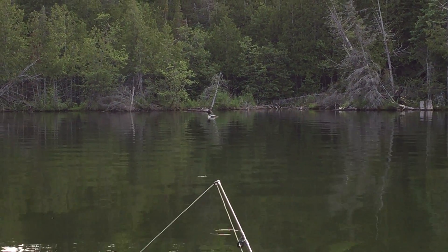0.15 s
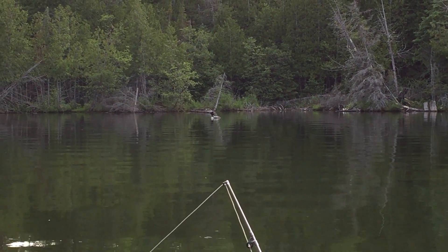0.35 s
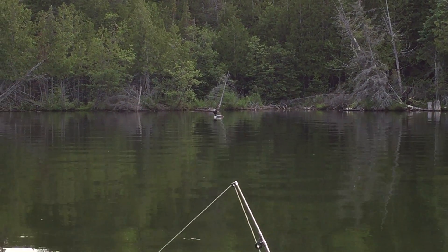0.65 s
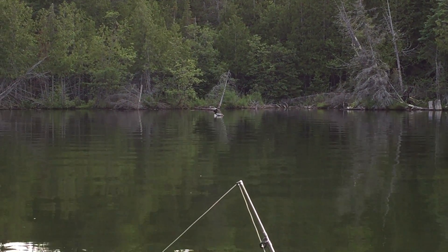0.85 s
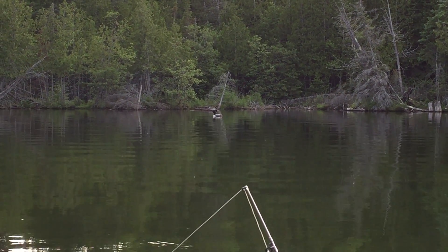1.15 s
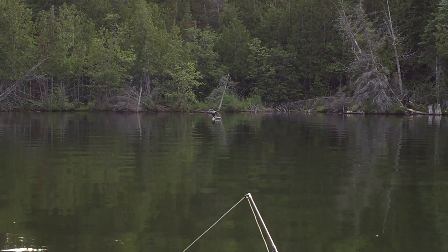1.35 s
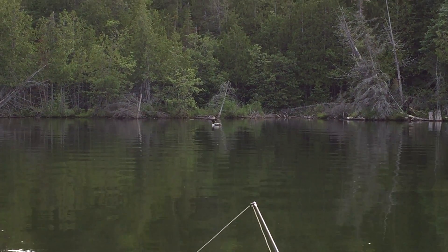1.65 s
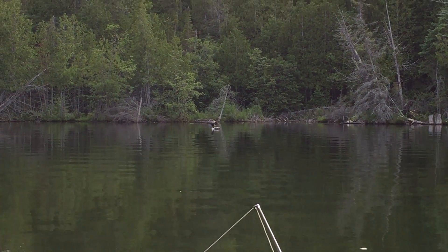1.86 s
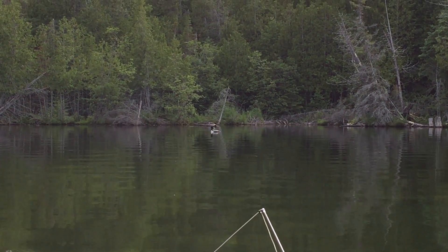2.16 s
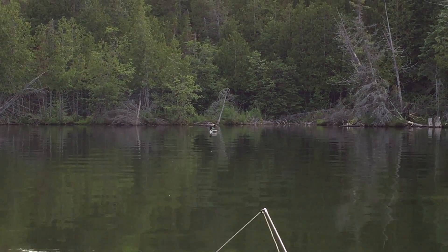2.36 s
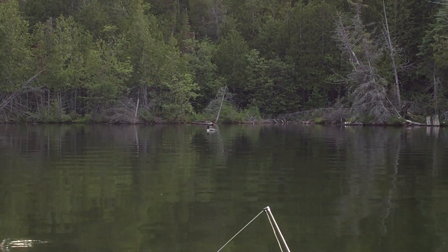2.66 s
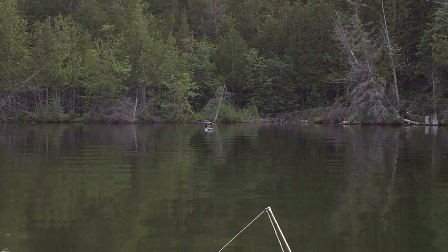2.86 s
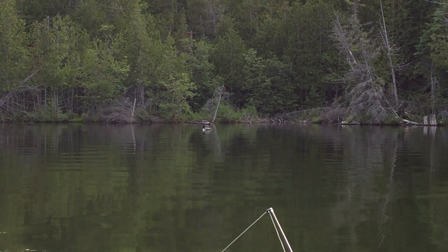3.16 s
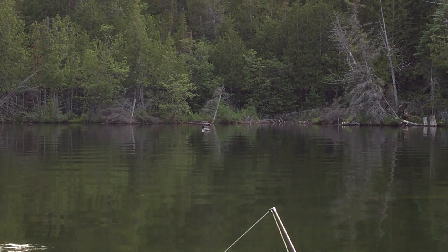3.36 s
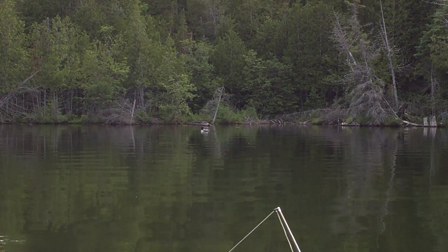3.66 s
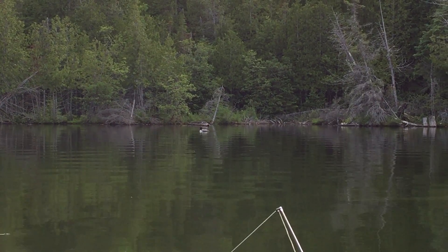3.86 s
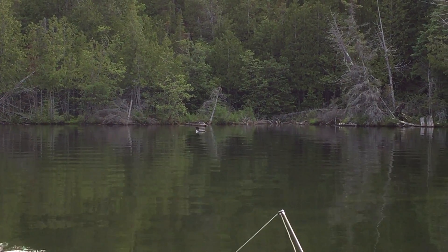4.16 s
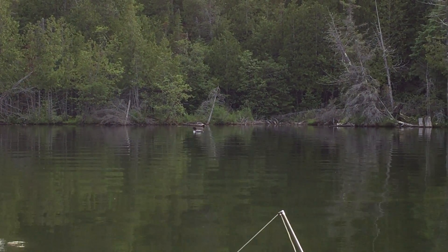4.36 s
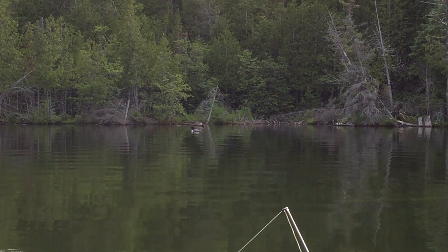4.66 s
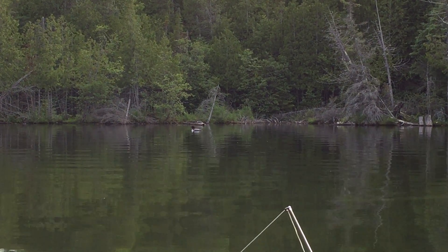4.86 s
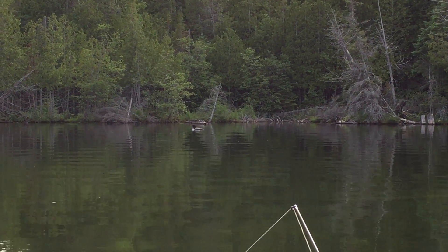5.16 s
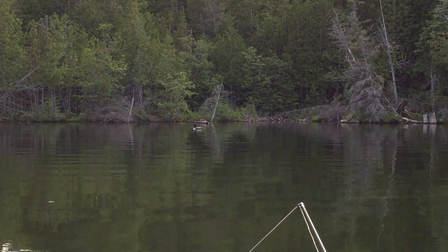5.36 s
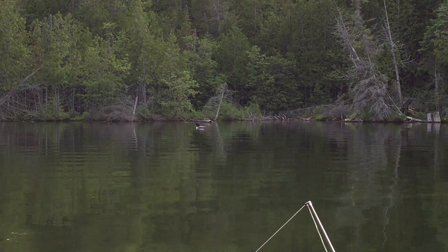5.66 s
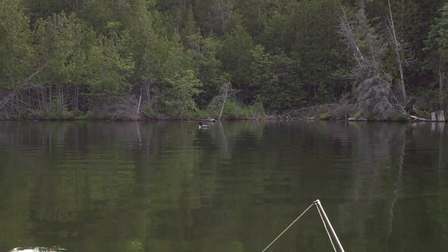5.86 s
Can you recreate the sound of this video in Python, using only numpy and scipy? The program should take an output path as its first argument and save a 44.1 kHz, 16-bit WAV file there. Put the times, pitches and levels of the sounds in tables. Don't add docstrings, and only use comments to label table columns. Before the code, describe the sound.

A loon gives two wavering tremolo cries that echo off wooded shores, then a small distant bird whistles over low rumble and hiss.

```python
import sys
import numpy as np
from scipy import signal
from scipy.fft import rfft, irfft
from scipy.io import wavfile
from scipy.ndimage import uniform_filter1d

SR = 44100
rng = np.random.default_rng(int(sys.argv[2]) if len(sys.argv) > 2 else 0)


def dump(signal):
    limited = np.clip(np.atleast_2d(signal).T, -1, 1)
    pcm = np.round(limited * 32767).astype(np.int16)
    wavfile.write(sys.argv[1], SR, pcm)


def attenuation_scalar(level_db):
    decades = np.asarray(level_db, float) / 20
    return 10 ** decades


N = 264600


def on_log(table, hz, col=1):
    table = np.array(table)
    return np.interp(np.log(np.maximum(hz, 1)), np.log(table[:, 0]), table[:, col])


def wobble(rate, count):
    size = int(SR / rate)
    x = rng.standard_normal(count + 4 * size)
    x = uniform_filter1d(uniform_filter1d(x, size), size)
    return x[2 * size:][:count] * np.sqrt(1.5 * size)


def rounded(t, s, c):
    slope, step = np.gradient(c, s), np.diff(c)
    slope[1:-1] *= step[1:] * step[:-1] > 0
    k = np.clip(np.searchsorted(s, t) - 1, 0, len(s) - 2)
    h = s[k + 1] - s[k]
    u = np.clip((t - s[k]) / h, 0, 1)
    bend = slope[k] * (1 - u) - slope[k + 1] * u
    return c[k] + step[k] * u * u * (3 - 2 * u) + h * u * (1 - u) * bend


def curves(rows, edge_s):
    s, *cols = np.transpose(rows)
    t = np.arange(s[0] - edge_s, s[-1] + edge_s, 1 / SR)
    fade = np.clip(np.minimum(t - t[0], t[-1] - t) / (2 * edge_s), 0, 1)
    return int(t[0] * SR), np.sin(fade * np.pi / 2) ** 2, [rounded(t, s, c) for c in cols]


def air():
    # frequency in Hz, level in dB per Hz.
    air_spectrum = [(12, -34.5), (20, -23), (80, -3.5), (133, -10), (153, -12), (191, -11.5), (382, -20.5),
                    (427, -21), (464, -22), (810, -25), (957, -25.5), (2330, -29.5), (4950, -34.5),
                    (8870, -38.5), (15500, -42.5)]
    # time in seconds, level in dB.
    rumble_swell = [(0, 3.5), (0.601, 1), (0.998, 1), (1.3, -0.5), (2.5, -1), (3.5, -0.55), (4.0, -0.5),
                    (4.6, -4), (5.3, 0.8), (6, -3)]
    level_db = -66.5
    hz = np.fft.rfftfreq(N, 1 / SR)
    bass_loss = 1 / (1 + (33 / (hz + 1)) ** 4)
    spectrum = rfft(rng.standard_normal(N)) * attenuation_scalar(on_log(air_spectrum, hz)) * bass_loss
    spectrum = spectrum * attenuation_scalar(-4 * np.exp(-((hz - 10500) / 450) ** 2))
    low = 1 / (1 + (hz / 300) ** 4)
    swell_db = np.interp(np.arange(N) / SR, *np.transpose(rumble_swell)) + 1.4 * wobble(4.8, N)
    rumble = irfft(spectrum * low, N) * attenuation_scalar(swell_db)
    hiss = irfft(spectrum * (1 - low), N) * attenuation_scalar(0.32 * wobble(5.6, N))
    bed = rumble + hiss
    return bed * attenuation_scalar(level_db) / np.std(bed)


def drone():
    # time in seconds, level in dB.
    motor_fade = [(0, -61.5), (0.301, -71.5), (.6, -73.5), (1.0, -83), (1.4, -96)]
    centre_hz, width_hz = 196, 54
    edges = [centre_hz - width_hz / 2, centre_hz + width_hz / 2]
    sos = signal.butter(2, edges, "bandpass", fs=SR, output="sos")
    band = signal.sosfilt(sos, rng.standard_normal(N))
    return band / np.std(band) * attenuation_scalar(np.interp(np.arange(N) / SR, *np.transpose(motor_fade)))


def effort(t):
    # start and peak in seconds, low-register pitch at start
    # and at peak in Hz, strength in dB.
    cries = [
        [(.021, .068, 654.3, 821.3, 0.5), (.108, .158, 703.6, 912, -3), (.206, .253, 736, 900, -16.5),
         (.321, .357, 755, 1000, 3), (.420, .477, 650, 822.2, -1.5)],
        [(2.160, 2.192, 393.3, 728, -1), (2.254, 2.320, 644.3, 895.2, 2), (2.357, 2.404, 698, 942, 0),
         (2.467, 2.503, 707, 967, -1), (2.568, 2.624, 645, 863.6, 0.5)],
    ]
    # second partial,
    # third partial and upper partials in dB.
    cry_postures = [
        [(5.5, 5, -0.5), (0.5, -3, 3.5), (-0.3, 0.8, -2.5), (-6, -4, 1.5), (-3.5, -5, -1.5)],
        [(8.5, 8, -4), (0, 6, 0.5), (-4, -8.5, 0), (-5.5, -7.5, 2.5), (-3, -17, 1.5)],
    ]
    # time in seconds, pitch after the last fall in Hz.
    cry_ends = [
        (.548, 655),
        (2.705, 647.5),
    ]
    rise_shape = 0.8
    fall_s, fall_shape, locked_fall_shape, sag_hz_per_s = 0.041, 1.15, 1.4, 1300
    last_fall_s, last_fall_shape, ebb_skew = 0.038, 1.201, 1.5
    attack_s, attack_db, release_s, release_db = 0.016, -16, 0.012, -6.5

    def arch(up, down, shape):
        rise = np.clip(up, 0, 1) ** rise_shape
        return np.sin(np.pi / 2 * rise * (1 - np.clip(down, 0, 1) ** shape)) ** 2

    push, ebb, spent, hz = np.zeros(N), np.zeros(N), np.zeros(N), np.full(N, 600.)
    posture_db, swell_db = np.zeros((4, N)), np.full(N, -200.)
    for pulses, postures, (end, end_hz) in zip(cries, cry_postures, cry_ends):
        after = [row[::2] for row in pulses[1:]] + [(end, end_hz)]
        for (start, peak, start_hz, peak_hz, _), (stop, stop_hz, *_) in zip(pulses, after):
            last = stop == end
            on = (t >= start) & (t < stop)
            now = t[on]
            fall = min(fall_s, stop - peak)
            up = (now - start) / (peak - start)
            down = np.clip((now - peak) / (last_fall_s if last else stop - peak), 0, 1)
            push[on] = arch(up, (now - peak) / fall, locked_fall_shape)
            spent[on] = np.maximum(now - peak - fall, 0)
            ebb[on] = down if last else np.sin(np.pi * down ** ebb_skew)
            rest_hz = np.where(now < peak, start_hz, stop_hz - last * sag_hz_per_s * spent[on])
            shape = last_fall_shape if last else fall_shape
            hz[on] = rest_hz + (peak_hz - rest_hz) * arch(up, down, shape)
        _, peaks, *_, strength = np.transpose(pulses)
        start = pulses[0][0]
        on = (t >= start) & (t < end)
        posture_db[:, on] = [np.interp(t[on], peaks, strength + c) for c in [0, *np.transpose(postures)]]
        corners = [start, start + attack_s, end - release_s, end]
        swell_db[on] = np.interp(t[on], corners, [attack_db, 0, 0, release_db])
    return push, ebb, spent, hz, posture_db, swell_db


def controls(windpipe_hz):
    # start and end in seconds, depth of the beat 0-1,
    # pull toward the windpipe 0-1, level in dB.
    breaks = [
        (0.14, 0.159, 0.3, 0.38, 2.3),
        (2.157, 2.19, 0.1, 0, -3),
        (2.305, 2.345, 0.2, 0.11, -0.5),
        (2.385, 2.395, 0.2, 0.36, 5),
        (2.49, 2.492, 0.4, 0.4, 7.5),
        (2.614, 2.642, 0.2, 0.13, -2),
    ]
    # start and end in seconds, pitch at full effort
    # and at rest in Hz, level in dB.
    locks = [
        (0.159, .3185, 1218, 978.2, -2.2),
        (.338, 0.4112, 1191, 968, -3),
        (2.397, 2.4585, 1200, 952.5, -0.6),
        (2.493, 2.5552, 1190, 945, -1.25),
    ]
    # pitch in Hz, first, second and
    # third partial in dB, upper partials in dB.
    low_voice = [(433, -49.5, -37.5, -46, -90), (580, -53.5, -51.5, -74.5, -86),
                 (629.4, -44.5, -52.5, -79, -67.5), (723.3, -37, -43, -62.5, -60.5),
                 (786, -35, -34.5, -63, -50), (841, -36, -35, -63.5, -48), (892, -34, -35.5, -76, -50),
                 (1000, -29.5, -29.5, -74.5, -47)]
    locked_voice = [(945, -30, -73.5, -89, -78), (980, -31, -65.5, -75.5, -71), (978, -27.5, -55, -62, -68),
                    (1080, -23, -51, -52.5, -54), (1136, -21.5, -47.5, -48, -54),
                    (1220, -19, -47, -55.5, -53.5)]
    # first, second, third and upper partials in dB.
    break_loss_db = [-0.5, -11.5, -5.5, -9]
    ebb_loss_db = [-1, -7, 0.5, -5.5]
    flip_dip_db = [-8, -7.5, -15.5, -12]
    flip_dip_s = 0.0024
    landing, landing_s = 0.94, 0.03
    sag_hz_per_s = 1100
    catch_s = 2.253

    t = np.arange(N) / SR
    push, ebb, spent, hz, posture_db, swell_db = effort(t)
    sounding = swell_db > -100
    trim_db, beat, locked = np.zeros((4, N)), np.zeros(N), np.zeros(N, bool)
    for start, end, depth, pull, db in breaks:
        on = (t >= start) & (t < end)
        hz[on] += pull * (windpipe_hz - hz[on])
        beat[on] = depth
        trim_db[:, on] = db + np.c_[break_loss_db]
    for start, end, top_hz, rest_hz, db in locks:
        on = (t >= start) & (t < end)
        reach = np.maximum(push, landing * (ebb == 0) * (t < start + landing_s))
        hz[on] = (rest_hz + (top_hz - rest_hz) * reach - sag_hz_per_s * spent)[on]
        locked[on] = True
        trim_db[:, on] = db
    flips = [catch_s, *t[1:][np.diff(locked)]]
    falter = sum(np.exp(-((t - s) / flip_dip_s) ** 2) for s in flips)

    def levels_at_pitch(voice):
        pitch, *cols = np.transpose(voice)
        return np.array([np.interp(hz, pitch, col) for col in cols])

    low_db = levels_at_pitch(low_voice) + posture_db + np.c_[ebb_loss_db] * ebb
    levels = np.where(locked, levels_at_pitch(locked_voice), low_db)
    levels = levels + trim_db + np.c_[flip_dip_db] * falter
    gate = np.clip(4 * uniform_filter1d(1. * sounding, SR // 100), 0, 1) ** 2
    size = SR // 400
    held = [np.interp(t, t[sounding], c[sounding]) for c in [hz, *(levels + swell_db), beat]]
    return gate, [uniform_filter1d(uniform_filter1d(c, size), size) for c in held]


def loon():
    # frequency in Hz, level in dB.
    beak_colour = [(1500, -3.5), (2350, -12.5), (2750, -10.5), (3250, 4.5), (3900, 0.5), (4700, -3),
                   (5800, -7), (6600, -14.5), (7300, -34.5), (8300, -30.5), (9600, -34.5), (10500, -48)]
    # time in seconds, tilt in dB per octave.
    beak_gape = [(.04, 9.5), (.09, 11.5), (.15, 0.5), (.25, -3.5), (.36, -5.5), (.47, -2), (2.199, 2.5),
                 (2.29, 6), (2.381, -8.5), (2.42, -4.5), (2.479, -18), (2.52, -11.5), (2.6, -16),
                 (2.66, -24)]
    windpipe_hz, break_rough, clear_rough = 1195, 0.14, 0.012
    flutter_db, breath_db, break_breath_db = -34, -20, -8
    effort_tilt, effort_mid_db = 1, -55
    upper_beat = 0.5001

    gate, (hz, *low_db, upper_db, beat) = controls(windpipe_hz)
    broken = np.clip(beat / 0.25, 0, 1)
    rough = clear_rough + (break_rough - clear_rough) * broken
    pull = 2 * np.pi * np.cumsum(windpipe_hz - hz) / SR + rough * 8 * wobble(60, N)
    phase = 2 * np.pi * np.cumsum(hz) / SR + rough * wobble(400, N)
    low = sum(attenuation_scalar(db) * np.sin((n + 1) * phase + beat * np.sin(pull) - 1.2 * n)
              for n, db in enumerate(low_db))
    on = gate > 1e-6
    k = np.arange(4, 15)[:, None]
    gape = np.interp(np.arange(N)[on] / SR, *np.transpose(beak_gape))
    tilt = effort_tilt * np.clip(upper_db[on] - effort_mid_db, -15, 8) + gape
    tilt_db = tilt * np.log2(np.minimum(k * hz[on], 6500) / 3500)
    colour = attenuation_scalar(on_log(beak_colour, k * hz[on]) + tilt_db)
    shaken = (phase + upper_beat * beat * np.sin(pull))[on]
    upper = np.zeros(N)
    upper[on] = np.sum(colour * np.sin(k * shaken + 0.36 * k), axis=0)
    upper[on] /= np.sqrt(np.sum(colour ** 2, axis=0))
    bins = np.fft.rfftfreq(N, 1 / SR)
    breath = irfft(rfft(rng.standard_normal(N)) * attenuation_scalar(on_log(beak_colour, bins)) * (bins > 1500), N)
    breath = breath / np.std(breath) * attenuation_scalar(breath_db + (break_breath_db - breath_db) * broken)
    flutter = 1 + beat * np.cos(pull) + attenuation_scalar(flutter_db) * wobble(650, N)
    voice = np.sqrt(2) * gate * flutter * (low + attenuation_scalar(upper_db) * (upper + breath))
    return signal.sosfilt(signal.butter(4, 480, "highpass", fs=SR, output="sos"), voice)


def shore(x):
    # frequency in Hz, near trees in dB, their 60 dB decay in seconds,
    # far shore in dB, its 60 dB decay in seconds.
    echo_bands = [(494, -13, 1, -35, 2.6), (740, -7, 0.8, -36, 3.6), (1000, -8.5, .9, -40.5, 6.8),
                  (1190, -17, 0.93, -26, 2.75), (1700, -2.5, 0.52, -36, 3.5), (2550, -14, 0.78, -45, 1.5),
                  (4450, -4, 0.51, -54, 1.2), (7920, -16, .3, -57, .8)]
    # delay in seconds, level on the echo in dB.
    tree_stands = [(0, -27.5), (.012, -12.5), (.04, -14), (.075, -2.5), (.16, 1), (.24, 7), (.4, 1.8),
                   (.55, 2.5), (.75, -2.8), (.9, -1.5), (1.05, -1), (1.2, 1.5), (2, -19)]
    count = 2 * SR
    t = np.arange(count) / SR
    clumps = attenuation_scalar(np.interp(t, *np.transpose(tree_stands)) + 1.3 * wobble(30, count))
    spectrum, hz = rfft(rng.standard_normal(count)), np.fft.rfftfreq(count, 1 / SR)
    centres = np.log(np.array(echo_bands)[:, 0])
    response = 0
    for k, (_, near_db, near_s, far_db, far_s) in enumerate(echo_bands):
        window = np.interp(np.log(hz + 1), centres, np.arange(len(centres)) == k)
        decay = attenuation_scalar(near_db - 60 * t / near_s) + attenuation_scalar(far_db - 60 * t / far_s)
        response = response + irfft(spectrum * window, count) * decay
    return signal.fftconvolve(x, response * clumps * np.sqrt(10 / SR))[:N]


def ticks():
    # time in seconds, centre and width in Hz, length in seconds, level in dB.
    twig_ticks = [
        (.596, 8100, 1500, .004, -73),
        (3.054, 4200, 500, .008, -79),
        (3.278, 5150, 300, .012, -80),
        (3.236, 3400, 500, .012, -81),
        (3.305, 3100, 500, .01, -83),
        (3.736, 5000, 1600, .0035, -67),
        (4.62, 4680, 300, .02, -81),
    ]
    out, t = np.zeros(N), np.arange(SR // 20) / SR
    for s, hz, width, length, db in twig_ticks:
        sos = signal.butter(2, [hz - width / 2, hz + width / 2], "bandpass", fs=SR, output="sos")
        band = signal.sosfilt(sos, rng.standard_normal(len(t)))
        swell = np.exp(-((t - 2 * length) / length) ** 2)
        out[int(s * SR):][:len(t)] += attenuation_scalar(db) * band / np.std(band) * swell
    return np.roll(out, -SR // 100)


def grunt():
    # time in seconds, pitch in Hz, first, second and third partial in dB.
    throat_grunt = [
        [(2.052, 341, -98, -71, -82), (2.068, 365.4, -87, -70, -63), (2.085, 380, -74, -70.5, -67),
         (2.115, 350, -81.5, -73, -79.5)],
    ]
    out = np.zeros(N)
    start, fade, (hz, *levels_db) = curves(throat_grunt[0], edge_s=0.005)
    phase = 2 * np.pi * np.cumsum(hz) / SR
    tone = sum(attenuation_scalar(db) * np.sin((k + 1) * phase) for k, db in enumerate(levels_db))
    out[start:start + len(hz)] = np.sqrt(2) * fade * tone
    return out


def hull():
    # time in seconds, peak in dB, frequency in Hz.
    water_thumps = [(2.543, -57, 68), (2.852, -58, 96.6), (2.99, -57, 83.1), (3.741, -56, 68),
                    (3.855, -51.5, 111), (3.989, -52, 87.8), (4.339, -56, 131), (5.315, -55.5, 87.6),
                    (5.477, -55, 78.1), (5.566, -57, 131)]
    out, t = np.zeros(N + SR), np.arange(SR // 10) / SR
    for s, db, hz in water_thumps:
        start = int(s * SR)
        knock = np.e * t / 0.014 * np.exp(-t / 0.012)
        out[start:start + len(t)] += attenuation_scalar(db - 1.5) * knock * np.sin(2 * np.pi * hz * t)
    return out[:N]


def songbird():
    # seconds after onset, frequency in Hz, level in dB.
    fall_shape = [(0, 4134, -9.5), (.006, 4610, -12.5), (.012, 4638, -12.5), (.022, 4410, 0),
                  (.032, 4150, -1), (.040, 4360, -21)]
    lift_shape = [(0, 5600, -16), (.007, 4994, -15), (.018, 4964, -13), (.032, 5095, -6),
                  (.044, 5145, -8.5), (.052, 4797, -9)]
    # onset in seconds, level in dB, pitch factor.
    fall_events = [(3.335, -67.5, 0.99), (3.511, -63, 0.99), (3.688, -60, 0.98), (3.861, -61.5, 0.98),
                   (4.043, -61.5, 0.982), (4.216, -61, 0.97), (4.393, -61.5, 0.98)]
    lift_events = [(3.437, -63, 1.02), (3.615, -60, 1.01), (3.789, -55, 1), (3.967, -56.5, 1),
                   (4.143, -54, 1), (4.320, -54, 1.01)]
    # time in seconds, frequency in Hz, level in dB.
    swoops = [
        [(4.122, 6300, -85), (4.130, 6400, -77), (4.136, 6100, -88), (4.142, 5600, -75)],
        [(4.300, 6200, -80), (4.310, 6500, -81), (4.316, 6000, -83), (4.320, 5600, -73)],
        [(4.480, 3900, -77), (4.488, 4300, -71), (4.497, 4750, -81), (4.510, 4950, -72), (4.525, 4250, -74),
         (4.545, 3450, -84)],
        [(4.560, 2850, -82), (4.575, 2900, -86), (4.588, 3500, -83), (4.600, 4250, -72), (4.610, 4600, -81),
         (4.625, 4650, -80)],
    ]
    ring_db, ring_s, echo_db, echo_s = -10, 0.018, -22, 0.075
    notes = [[(t + s, hz * factor, db + d) for s, hz, d in shape]
             for shape, events in ((fall_shape, fall_events), (lift_shape, lift_events))
             for t, db, factor in events]
    out = np.zeros(N)
    for rows in notes + swoops:
        start, fade, (hz, db) = curves(rows, edge_s=0.003)
        db = db + 2.2 * wobble(150, len(hz))
        whistle = np.sin(2 * np.pi * np.cumsum(hz) / SR)
        out[start:start + len(hz)] += np.sqrt(2) * fade * attenuation_scalar(db) * whistle
    t = np.arange(SR // 5) / SR
    branches = rng.standard_normal(len(t)) * np.exp(-t / ring_s) * np.sqrt(2 / ring_s / SR)
    out = out + attenuation_scalar(ring_db) * signal.fftconvolve(out, branches)[:N]
    return out + attenuation_scalar(echo_db) * np.roll(out, int(echo_s * SR))


def scene():
    turn_s, turn_db = 1.9, -0.97
    bird_wet_db = -3
    cry = loon() + grunt()
    bird = songbird()
    toward_shore = cry * attenuation_scalar(turn_db * (np.arange(N) > turn_s * SR)) + attenuation_scalar(bird_wet_db) * bird
    background = ticks() + air() + hull() + drone()
    return (cry + bird + shore(toward_shore) + background)[None]


def band_limit(x):
    return signal.sosfilt(signal.butter(12, 15630, fs=SR, output="sos"), x)


def record(dry):
    return band_limit(dry)


dry = scene()
out = record(dry)
dump(out)
```